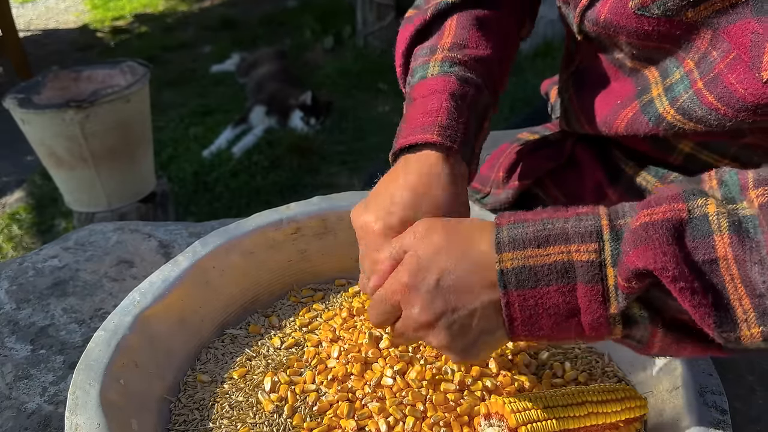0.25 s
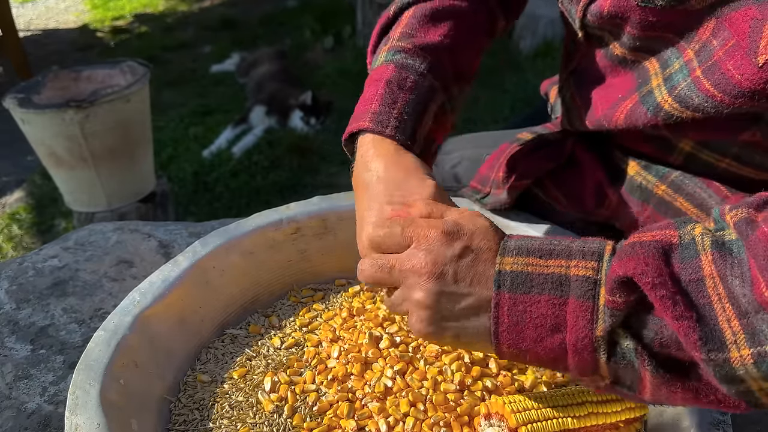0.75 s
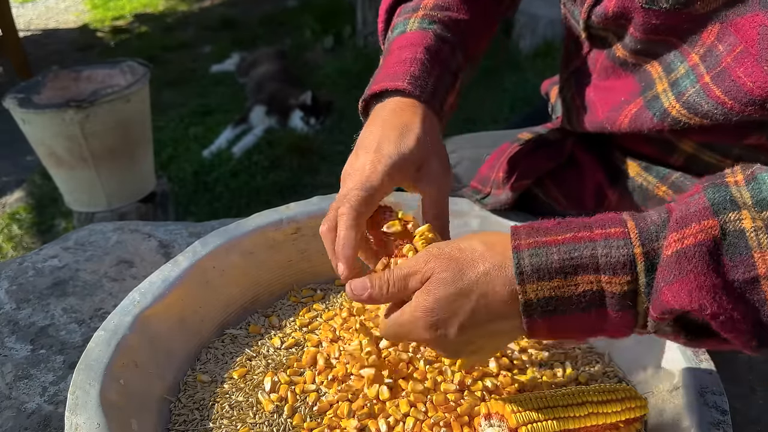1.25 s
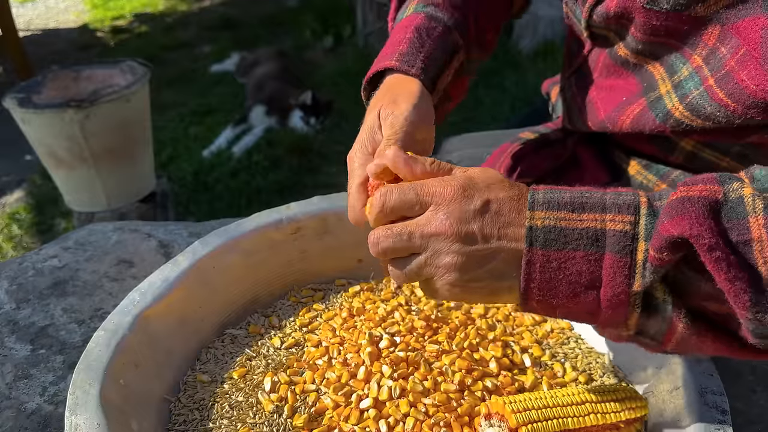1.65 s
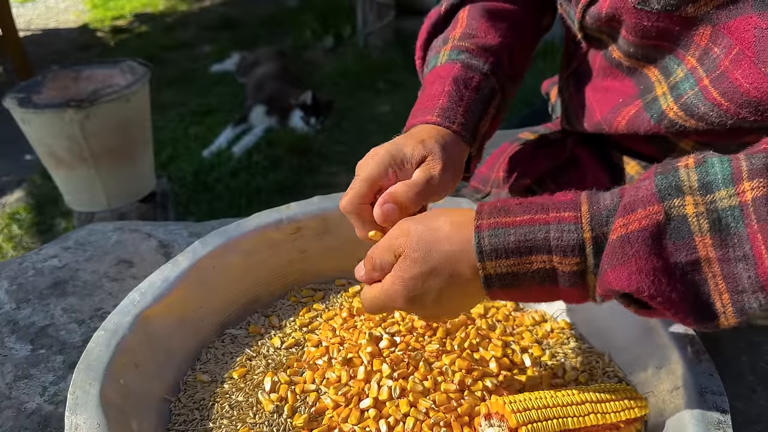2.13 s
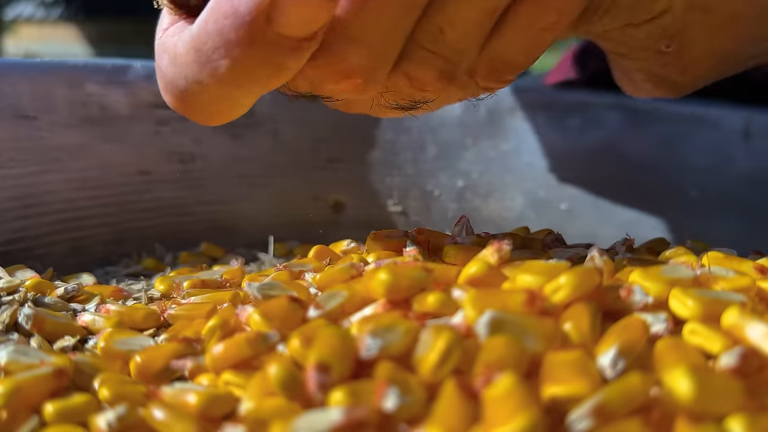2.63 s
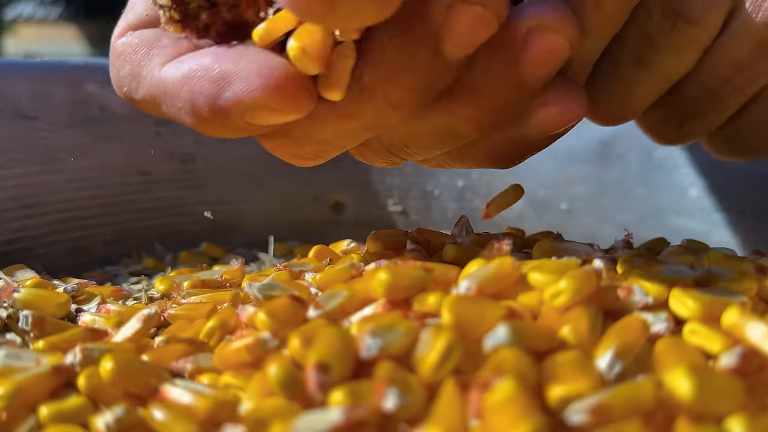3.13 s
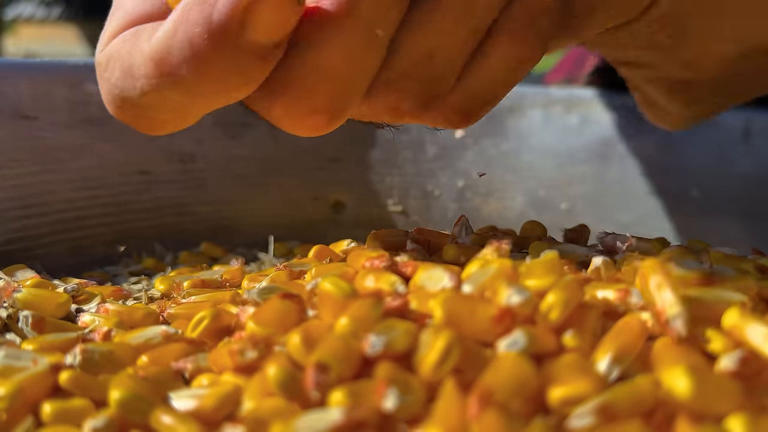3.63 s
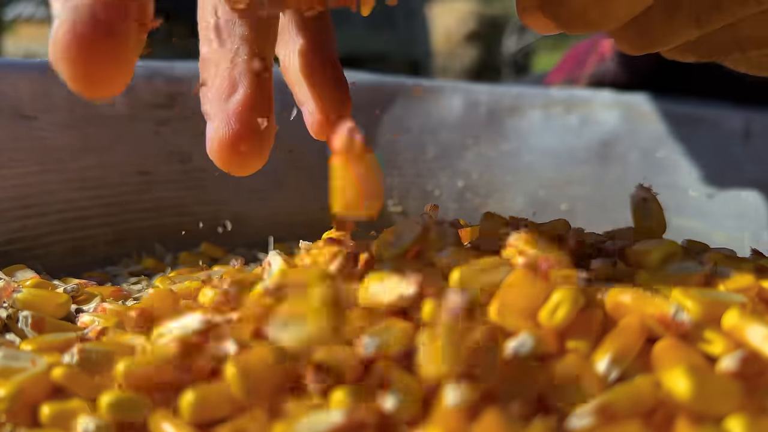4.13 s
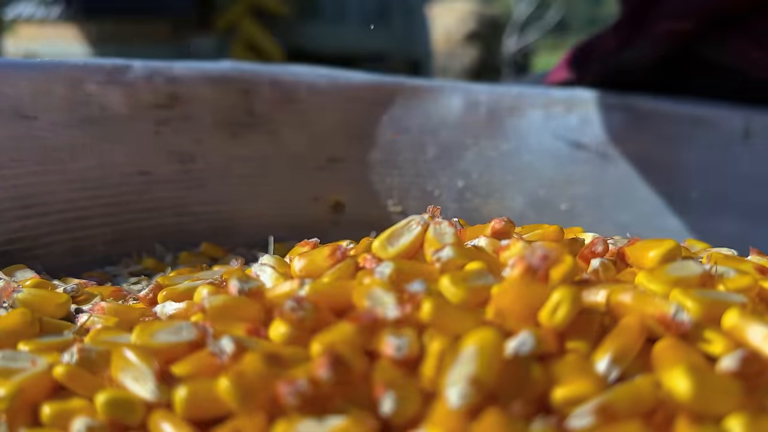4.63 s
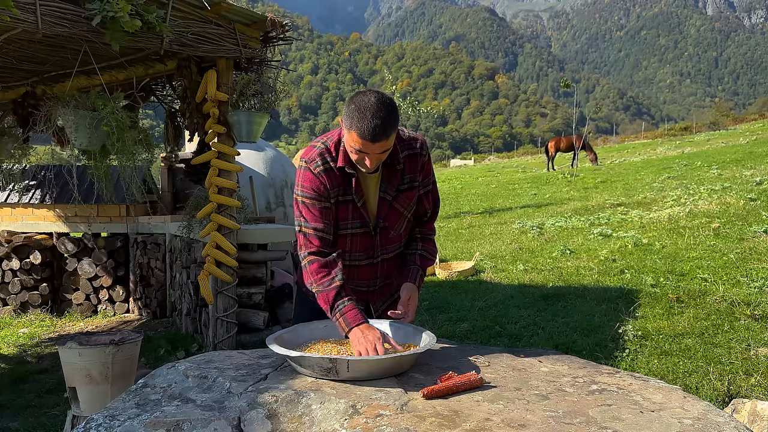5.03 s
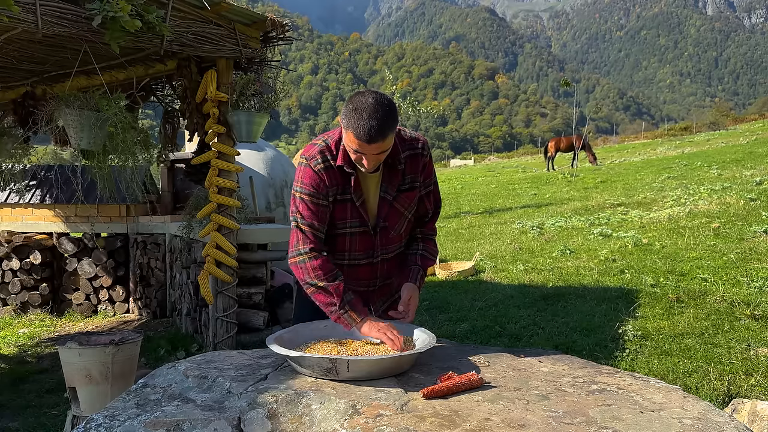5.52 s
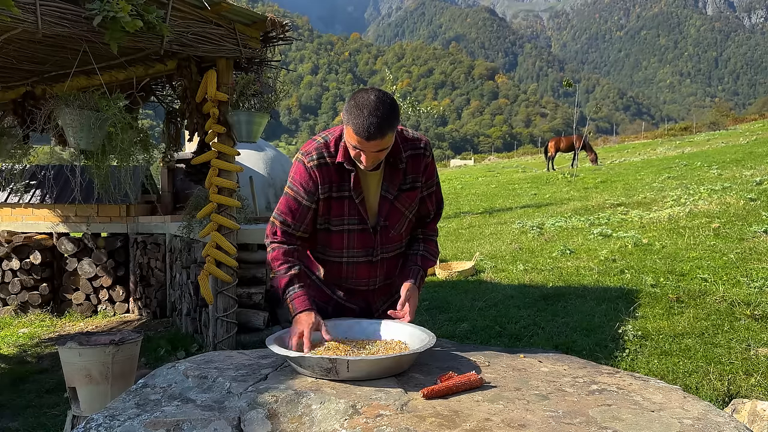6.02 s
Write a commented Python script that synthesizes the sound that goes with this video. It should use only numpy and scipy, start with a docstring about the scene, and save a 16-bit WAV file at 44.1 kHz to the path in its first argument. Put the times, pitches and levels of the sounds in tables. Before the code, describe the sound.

Outdoors, close to a metal basin, hands twist a dry corn cob with soft rustles and scattered clicks. One kernel pings sharply off the bare wall. The patter thickens, a handful tumbles onto the heap with small dull thuds, then quiet, then a smooth grainy rake. Low wind buffets the microphone throughout, strongest near the raking.

```python
"""Hands twist dried kernels off a cob over a metal basin outdoors, let a handful fall, then rake the heap.
Noise swelling with each stroke makes the rustle; short bursts make the ticks of single kernels on the heap.
Damped tones thud in the loaded basin floor, and a few kernels set the bare basin wall ringing.
These sounds and a deep wind rumble sit in the centre, as from a near microphone.
Around them, as from a wide pair, shaped noise makes the open air and gusts, and slowing tones the wind slaps."""
import sys
import numpy as np
from scipy import signal
from scipy.fft import rfft, irfft
from scipy.io import wavfile
from scipy.ndimage import uniform_filter1d

SR = 44100
rng = np.random.default_rng(int(sys.argv[2]) if len(sys.argv) > 2 else 0)


def wav_out(sig):
    """Save sig, one row per channel (or a flat mono array), as 16-bit PCM at SR to the path in sys.argv[1]."""
    wavfile.write(sys.argv[1], SR, np.round(np.clip(np.atleast_2d(sig).T, -1, 1) * 32767).astype(np.int16))


N = 276507  # samples, about 6.3 s


def amp(db):
    """Turns decibels into a gain."""
    return 10 ** (np.asarray(db) / 20)


def evened(x):
    """Scales to an rms of 1."""
    return x / np.sqrt(np.mean(x ** 2) + 1e-20)


def peaked(x):
    """Scales to a peak of 1."""
    return x / abs(x).max()


def band(x, lo_hz, hi_hz, order=2):
    """Keeps the sound between two frequencies."""
    edges_hz = np.clip([lo_hz, hi_hz], 100, 21000)
    return signal.lfilter(*signal.butter(order, edges_hz, "band", fs=SR), x)


def hump(hz, centre_hz, octaves):
    """A broad resonance, symmetric on an octave scale."""
    distance = np.log2((hz + 1) / centre_hz) / octaves
    return 1 / (1 + distance ** 2)


def read(points, hz):
    """Reads a table of points along a log-frequency axis."""
    f, value = np.transpose(points)
    return np.interp(np.log(hz + 1), np.log(f + 1), value)


def curve(rows, t):
    """Reads every column of a time table at the times t."""
    s, *columns = np.transpose(rows)
    return [np.interp(t, s, c) for c in columns]


def add(mix, s, sound):
    """Mixes a sound in at time s, cut off at the end of the mix."""
    part = mix[..., round(s * SR):][..., :sound.shape[-1]]
    part += sound[..., :part.shape[-1]]


# how much stronger the left side of the noise is than the right: (f/Hz, level/dB)
SIDE_LEAN = [(60, -5), (250, -0.3), (600, 4.5), (1200, 4.5), (2500, 3.5)]


def noise(colour, same):
    """Two channels of steady coloured noise; same runs from 1 alike, through 0 unrelated, to -1 opposed."""
    hz = np.fft.rfftfreq(N, 1 / SR)
    a, b = rfft(rng.standard_normal((2, N)))
    same = np.clip(read(same, hz), -1, 1)
    right = same * a + np.sqrt(1 - same ** 2) * b
    pair = np.array([a, right]) * amp(read(colour, hz))
    lean = amp(np.outer([.5, -.5], read(SIDE_LEAN, hz)))
    return evened(irfft(pair * lean, N))


# colour of the open field, relative: (f/Hz, level/dB per Hz)
AIR_COLOUR = [(65, -39.5), (110, -5), (211, -4), (395, -12), (682, -10.5), (1200, -15.5), (1510, -20.5),
              (1680, -20), (3650, -37.5), (4790, -46.5), (10600, -57), (12000, -53), (16500, -99.5)]
# how alike the air is left and right: (f/Hz, likeness -1 to 1)
AIR_LIKENESS = [(60, 1), (290, 0.46), (640, -0.4), (1400, -0.24), (2100, -0.74), (2900, 0.49), (4000, 1)]


def air():
    """The open field is a steady, wide wash of noise."""
    return amp(-53.5) * noise(AIR_COLOUR, AIR_LIKENESS)


# colour of the deep wind pressure, relative: (f/Hz, level/dB per Hz)
RUMBLE_TONE = [(1, 17.5), (2, -10), (16, 0.5), (24, -6), (44, -27), (90, -29.5), (300, -90)]
# colour of the gusts, relative: (f/Hz, level/dB per Hz)
GUST_TONE = [(10, -15), (25, 6), (42, 24), (64, 21.5), (110, 13), (170, 7), (300, -72.5)]
# how the wind comes and goes, settings before the lumps and the left-right lean:
# (t/s, rumble level/dB, gust level/dB, level/dB of the gusts' opposed left-right part)
WIND_COURSE = [(0, -33, -49.5, -83), (.5, -35, -50.5, -77), (.84, -31, -51.5, -62), (1.1, -29.5, -45, -53),
               (1.43, -42, -50.5, -63), (1.61, -38.5, -47.5, -50), (1.9, -37, -53.5, -55),
               (2.4, -42, -45.5, -53), (2.9, -44.5, -45.5, -54), (3.1, -38, -46.5, -52),
               (3.5, -38.5, -55, -62), (3.8, -33.5, -47.5, -57), (4.3, -36.5, -51.5, -64),
               (4.64, -44, -48.5, -64), (4.85, -28.5, -52, -63), (5.03, -30, -53.5, -61),
               (5.15, -25, -44, -52), (5.42, -21.5, -56, -73), (5.65, -28, -57.5, -58),
               (6.1, -29.5, -62.5, -78), (6.27, -40, -46, -69)]
# wind slaps sweeping across the pair, the level 6.8 dB above the envelope's peak:
# (t/s on the right, level/dB, f/Hz it slows to, lag of the left side/s)
WIND_SLAPS = [(0.956, -31, 70.4, 0.0038), (1.55, -29.5, 65.4, 0.0023), (2.132, -36, 59.5, 0.0061),
              (3.049, -30, 56, 0.0043), (3.888, -29, 65, 0.0038), (4.305, -33, 80, 0.006),
              (5.111, -23, 64.4, 0.0047)]
LUMPS_DB = 3  # rms swing of the gusts


def wind():
    """Deep pressure swings in the centre, lumpy gusts on the pair, and single slaps."""
    t = np.arange(N) / SR
    near_db, shared_db, opposed_db = curve(WIND_COURSE, t)
    swing = noise(RUMBLE_TONE, [(1, 0.38)])[0]
    # steady its strength first, so that the table shapes it
    swing = swing / np.sqrt(uniform_filter1d(swing ** 2, size=SR // 4) + 0.15)
    out = swing * amp(near_db)

    # eight slow waves, 1.15 to 5.2 per second, make each part of the gusts lumpy
    waves = (np.sin(2 * np.pi * (4.6 * k / 8 * t + rng.random((2, 1)))) for k in range(2, 10))
    lumps = evened(sum(waves))
    gust_noise = noise(GUST_TONE, [(1, 0.005)])
    shared, opposed = gust_noise * amp([shared_db, opposed_db] + LUMPS_DB * lumps)
    out = out + shared + opposed * [[1], [-1]]

    u = t[:6000]
    for s, db, hz, lag in WIND_SLAPS:
        # the eddy starts small and fast, then slows
        turns = hz * (u + 0.0096 * (1 - np.exp(-u / 0.0091)))
        slap = amp(db) * np.sin(2 * np.pi * turns) * u / 0.02 * np.exp(1 - u / 0.0091)
        add(out[0], s + lag, slap)
        add(out[1], s, slap)
    return out


# kernels striking the bare wall; crack and knock are relative to the ringing:
# (t/s, peak level/dB, place on the wall 0 rim to 1 low flank, crack level/dB, knock level/dB)
WALL_STRIKES = [(0.9683, -37, 0.63, -14, 5.5), (.989, -18.5, 0.96, -26, -12), (1.0995, -30, 0.65, -23, -11),
                (1.1335, -38, 0.6, -17, -4), (1.5005, -7.5, 0.053, -6.5, -18),
                (5.5378, -35, 0.44, -11, -27), (5.564, -31, 0.27, -28, -7)]
# ringing tones of the basin wall, relative levels:
# (f/Hz, level/dB struck at the rim, level/dB struck on the flank, time to fade 60 dB at the rim/s)
WALL_MODES = [(560, -26, -16, .05), (660, -22, -16, .05), (845, -33, -17, .38), (1100, -26, -22, .04),
              (2103, -11, -24, .045), (2350, -16, -18, .045), (2496, -9, -10, .05), (2856, -6, 0, .045),
              (3225, -8, -10, .04), (3356, -14, -1, .05), (3571, 0, -14, .045), (4129, -6, -9, .03),
              (4588, -9, -11, .035), (5312, -17, -16, .03), (6500, -20, -24, .025), (7575, -11, -22, .02),
              (8765, -11, -24, .02), (10842, -11, -24, .02), (13215, -15, -27, .018),
              (15400, -16, -30, .015)]
FLANK_DAMPING = 0.34  # share of the ring time that the heap takes from the low flank


def basin():
    """A hard kernel cracks on the wall, knocks the bowl and leaves its modes ringing."""
    out, t = np.zeros(N), np.arange(12000) / SR
    hz, rim_db, flank_db, rim_t60 = np.transpose(WALL_MODES)[:, :, None]
    draws = rng.standard_normal((len(WALL_STRIKES), 12000))
    for (s, db, place, crack_db, knock_db), draw in zip(WALL_STRIKES, draws):
        depth = np.clip(place, 0, 1)
        mode_db = rim_db + depth * (flank_db - rim_db)
        t60 = rim_t60 * (1 - FLANK_DAMPING * depth)
        phase = np.pi * draw[:len(WALL_MODES), None]
        modes = amp(mode_db - 60 * t / t60) * np.sin(2 * np.pi * hz * t + phase)
        ring = modes.sum(0)
        dense = band(draw, 2580, 5000, order=3) * amp(-60 * t / 0.026)  # many weak, close modes
        thrown_back = amp(-13 - 60 * t / 0.051)  # the bowl returns some of the crack
        crack = band(draw, 6900, 13000) * (amp(-60 * t / 0.015) + thrown_back)
        knock = band(draw, 530, 1170) * amp(-60 * t / 0.11)
        hit = evened(ring) + amp(-4.5 - 16.0 * place) * evened(dense)
        hit = hit + amp(crack_db) * evened(crack) + amp(knock_db) * evened(knock)
        onset = 1 - np.exp(-t / 0.00012)
        add(out, s, amp(db) * peaked(hit * onset))
    return out


# kernels loading the basin floor through the heap: (t/s, peak level/dB, f/Hz)
FLOOR_THUDS = [(2.983, -42.5, 480), (2.998, -49, 407), (3.023, -42.5, 785), (3.05, -44, 585),
               (3.074, -43.5, 980), (3.102, -43.5, 635), (3.12, -46, 464), (3.186, -47, 470),
               (3.231, -40.5, 410), (3.283, -48, 553), (3.322, -48, 438), (3.341, -44, 417),
               (3.359, -43, 524), (3.375, -48, 554), (3.427, -58, 530), (3.47, -50, 510),
               (3.542, -39.5, 430), (3.556, -42, 416), (3.583, -43, 545), (3.631, -40, 550),
               (3.678, -48.5, 458), (3.788, -43.5, 664), (3.814, -47, 580), (3.836, -42.5, 460),
               (3.873, -46, 443), (3.889, -45, 540), (3.909, -46, 530), (3.925, -44, 580),
               (3.994, -42.5, 570), (4.01, -41.5, 620), (4.046, -41, 526), (4.085, -45.5, 590),
               (4.104, -43, 500), (4.131, -40.5, 615), (4.174, -38, 500), (4.235, -49, 422),
               (4.252, -48, 576)]
TUMBLE_DB, TUMBLE_S = -6, 0.077  # smaller landings: level against the thuds, averaging time


def thuds():
    """The loaded floor answers with a damped tone and rough noise; smaller landings fill in around them."""
    out, t = np.zeros(N), np.arange(3000) / SR
    fade = amp(-60 * t / 0.046) * (1 - np.exp(-t / 0.00096))
    draws = rng.standard_normal((len(FLOOR_THUDS), 3000))
    for (s, db, hz), draw in zip(FLOOR_THUDS, draws):
        tone = np.sin(2 * np.pi * hz * t)
        rough = 0.89 * evened(band(draw, 360, 617))
        add(out, s, amp(db) * peaked((tone + rough) * fade))
    busy = np.sqrt(abs(uniform_filter1d(out ** 2, size=round(TUMBLE_S * SR))))
    return out + amp(TUMBLE_DB) * busy * evened(band(rng.standard_normal(N), 414, 625))


# the loudest kernels snapping loose or landing on the heap:
# (t/s, body peak level/dB, body f/Hz, treble peak level/dB)
KERNEL_TICKS = [(0.022, -44, 1720, -59), (0.16, -38, 1740, -54), (.1734, -42, 2560, -75),
                (.245, -34, 4470, -55), (0.2578, -26.5, 1610, -36), (.272, -53, 5880, -56),
                (0.299, -37.5, 1740, -35.5), (0.336, -39, 1900, -47), (0.507, -45.5, 3600, -66),
                (0.559, -29.5, 1880, -42), (.5905, -46, 5100, -59), (0.6716, -43, 2300, -50),
                (.937, -41.5, 6200, -56), (1.1563, -45, 4970, -41), (1.2815, -40.5, 4250, -51),
                (1.2947, -37, 5650, -39), (1.301, -36, 4600, -35), (1.3248, -41, 2040, -32),
                (1.41, -42, 4500, -60), (1.585, -51, 5120, -55), (1.665, -35.5, 2720, -65),
                (1.789, -49, 4500, -64), (1.825, -51, 6000, -60), (1.872, -59, 4520, -58),
                (1.9465, -43, 3320, -65), (2.049, -39, 1720, -48), (2.073, -41.5, 5450, -43),
                (2.121, -31.5, 3970, -62), (2.127, -36.5, 2160, -53), (2.143, -35, 2520, -39),
                (2.1636, -36, 5300, -54), (2.1802, -31.5, 4460, -54), (2.4203, -47, 2750, -60),
                (2.4347, -39.5, 2640, -65), (2.4534, -40, 1520, -34), (2.4628, -40, 2600, -32.5),
                (2.4702, -37, 4670, -47), (2.5153, -38, 4460, -30.5), (2.5313, -42, 5400, -40),
                (2.5664, -43, 3490, -35), (2.579, -36, 3100, -37), (2.5856, -30, 2900, -45),
                (2.592, -36, 3150, -51), (2.598, -39, 2910, -33), (2.606, -37.5, 4930, -53),
                (2.6228, -40.5, 1700, -41), (2.6463, -35.5, 3020, -51), (2.676, -37, 3080, -61),
                (2.682, -30, 2700, -50), (2.6891, -29, 3240, -31.5), (2.7008, -32, 3300, -55),
                (2.7136, -38, 4450, -48), (2.7214, -29.5, 4820, -38), (2.726, -28.5, 3100, -48),
                (2.7404, -43, 3430, -56), (2.8764, -44, 3300, -53), (2.8903, -38, 2840, -55),
                (2.9294, -37.5, 3730, -57), (2.983, -34, 4900, -53), (2.9858, -34, 1780, -30.5),
                (2.996, -37, 3800, -59), (3.0252, -36, 1660, -49), (3.0336, -38, 4370, -30),
                (3.0455, -36, 2920, -52), (3.074, -29.5, 2000, -50), (3.0773, -18.5, 5270, -47),
                (3.1149, -51, 2480, -38), (3.121, -44, 5000, -44), (3.1278, -54, 1310, -37.5),
                (3.1343, -50, 1720, -43), (3.142, -52, 2800, -42), (3.23, -43, 1210, -31.5),
                (3.2367, -33, 1670, -55), (3.3405, -55, 2800, -33), (3.3461, -34, 1510, -47),
                (3.3596, -53, 2630, -31), (3.4043, -33, 5660, -49), (3.4309, -29, 1480, -50),
                (3.4594, -48, 1420, -51), (3.5016, -42.5, 1510, -58), (3.5418, -35, 4050, -36),
                (3.556, -36, 1210, -28.5), (3.591, -46, 4320, -57), (3.633, -32, 5240, -32),
                (3.672, -39, 1580, -49), (3.73, -39, 1560, -42), (3.79, -43, 2540, -37),
                (3.828, -35, 5300, -25.5), (3.838, -35.5, 5360, -28), (3.9018, -44, 1690, -33),
                (3.9277, -31, 4600, -29), (3.944, -38, 6340, -36), (3.9688, -39, 5000, -35),
                (3.9965, -55, 1830, -32), (4.0069, -53, 2300, -38), (4.0153, -56, 6290, -30),
                (4.026, -29.5, 5830, -27), (4.045, -37, 4730, -29), (4.0757, -42, 4950, -38),
                (4.081, -54, 4240, -33), (4.119, -34.5, 4700, -33), (4.1312, -37, 6100, -34),
                (4.176, -32.5, 4970, -23), (4.1906, -38.5, 1660, -37), (4.2095, -38, 5960, -31.5),
                (4.2701, -59, 1290, -42), (4.3898, -43.5, 4500, -44), (4.4715, -46, 4570, -72),
                (4.634, -40.5, 2660, -62), (5.21, -35, 4100, -51), (5.4648, -35.5, 2770, -58),
                (5.6, -33, 3470, -58), (5.9392, -43, 4070, -62), (5.95, -39, 4100, -61),
                (5.9565, -43, 3600, -58), (5.991, -48, 3530, -60), (6.0154, -35, 2500, -44),
                (6.0615, -33, 4370, -44), (6.0655, -27, 2870, -28.5), (6.0719, -28, 2200, -56),
                (6.08, -33, 1140, -48)]
TICK_T60_S = 0.014  # time for the main burst to fade 60 dB


def ticks():
    """Each kernel is a short burst through its body resonance plus a bright edge that dies sooner."""
    out, t = np.zeros(N), np.arange(2048) / SR
    scatter = amp(-13.5 - 60 * t / 0.042)  # neighbours shift a little afterwards
    body_fade = amp(-60 * t / TICK_T60_S) + scatter
    edge_fade = amp(-60 * t / (0.17 * TICK_T60_S)) + scatter
    ring_fade = amp(-60 * t / (1.14 * TICK_T60_S))
    draws = rng.standard_normal((len(KERNEL_TICKS), 2048))
    for (s, body_db, hz, treble_db), draw in zip(KERNEL_TICKS, draws):
        draw = draw + 4.6 * (t == 0)  # the first contact is a sharp click
        burst = draw * body_fade
        body = peaked(band(burst, hz / 1.15, hz * 1.165, order=1)) + peaked(band(burst, 1120, 6660))
        body = body + 0.55 * np.sin(2 * np.pi * hz * t) * ring_fade  # the kernel's own short ring
        edge = band(draw * edge_fade, 5500, 13800)
        add(out, s, amp(body_db) * peaked(body) + amp(treble_db) * peaked(edge))
    return out


def contacts(per_s, spread_db):
    """A random train of tiny contacts, a few of them large, as a gate for noise."""
    size = amp(spread_db * np.minimum(rng.exponential(1, N), 4))
    size = size * (rng.random(N) < per_s / SR)  # only a few samples hold a contact
    fade = amp(-60 * np.arange(600) / SR / .0035)
    grains = signal.oaconvolve(size ** 2, fade)[:N]
    return evened(np.sqrt(abs(grains)))


# twists of the cob, the falling handful and the rakes; levels are relative settings for the rustle:
# (start t/s, length/s, share of it spent swelling, body level/dB, hollow of the hands f/Hz at the start,
#  f/Hz at the end, treble level/dB, cupped palm level/dB)
HAND_STROKES = [(-.1, 0.18, 0.89, -65, 2400, 2390, -74, -78),
                (0.144, 0.28, 0.12, -64, 2410, 2200, -77, -68),
                (0.436, 0.33, 0.17, -65.5, 2200, 2200, -81, -72),
                (0.825, 0.4, 0.43, -65, 2800, 3000, -73, -68),
                (1.19, 0.26, 0.52, -68, 2500, 2500, -69.5, -81),
                (1.495, 0.22, 0.32, -72.5, 3180, 2800, -76, -78),
                (1.756, 0.38, 1, -66.5, 2320, 2400, -82, -75),
                (2.004, 0.42, 0.43, -67, 2590, 3070, -75, -72),
                (2.237, 0.36, 0.52, -64.5, 2760, 3460, -67.5, -88),
                (2.508, 0.19, 0.53, -58, 3030, 2900, -72, -75),
                (2.652, .12, 0.36, -54.5, 2900, 3000, -81, -66),
                (2.818, 0.36, 0.23, -58.5, 2900, 3400, -66, -62.5),
                (3.168, 0.35, 0.64, -54.5, 2400, 2930, -68, -62),
                (3.572, 0.35, 0.36, -58, 3100, 2750, -66, -58.5),
                (3.778, 0.44, 0.86, -63, 3060, 3950, -62, -70),
                (4.338, 0.5, 0.61, -69.5, 2750, 2540, -67, -77),
                (4.79, .24, 0.55, -62.5, 4900, 4360, -71, -87),
                (4.94, 0.34, 0.47, -54.5, 3880, 2830, -65.5, -73),
                (5.09, 0.581, 0.77, -56, 2900, 2500, -62.5, -63.5),
                (6.038, .08, 0.42, -53.5, 3000, 2400, -58, -70),
                (6.09, 0.18, .4, -55.5, 2250, 2800, -61, -70)]
SWELL_EDGE, FALL_EDGE = 1.22, 0.85  # powers: 2 is soft, below 1 is abrupt
SETTLE_DB, SETTLE_T60_S = -15.5, 0.62  # kernels go on trickling after the hand lets go


def strokes(t):
    """Progress 0-1 and strength 0-1 of each stroke: it swells, lets go, and the kernels settle."""
    start, length, swell = np.transpose(HAND_STROKES)[:3, :, None]
    progress = np.clip((t - start) / length, 0, 1)
    swell = np.clip(swell, .05, .95)
    rise = np.sin(np.pi / 2 * np.minimum(progress / swell, 1)) ** SWELL_EDGE
    fall = np.sin(np.pi / 2 * np.minimum((1 - progress) / (1 - swell), 1)) ** FALL_EDGE
    settle = amp(SETTLE_DB - 60 * np.maximum(t - start - length, 0) / SETTLE_T60_S)
    return progress, rise * np.maximum(fall, settle)


REST_DB, REST_TREBLE_DB, REST_HZ = -77.5, -81.5, 1950  # hands nearly still: body, treble, hollow
PALM_HZ, PALM_OPENS_HZ = 1473, 350  # the palm's low hollow, and its rise as the grip opens


def hands(t):
    """Gains of body, treble and palm and the two hollows in Hz, with the power of all strokes summed."""
    progress, strength = strokes(t)
    body_db, from_hz, to_hz, treble_db, palm_db = np.transpose(HAND_STROKES)[3:, :, None]
    body, treble, palm = ((amp(db) * strength) ** 2 for db in (body_db, treble_db, palm_db))
    rest = amp(REST_DB) ** 2
    body_sum = body.sum(0) + rest
    stroke_hz = from_hz + (to_hz - from_hz) * progress
    # stronger strokes count for more in the shared hollow
    hollow_hz = ((body * stroke_hz).sum(0) + rest * REST_HZ) / body_sum
    palm_hz = PALM_HZ + PALM_OPENS_HZ * (palm * progress).sum(0) / (palm.sum(0) + 1e-20)
    treble_sum = treble.sum(0) + amp(REST_TREBLE_DB) ** 2
    return np.sqrt([body_sum, treble_sum, palm.sum(0)]), hollow_hz, palm_hz


# the packed kernels shifting under the hands, relative: (t/s, level/dB)
HEAP_SHIFT = [(0.0, -69), (0.37, -70), (0.86, -67.5), (1.06, -67), (1.82, -73.5), (2.67, -63), (2.79, -69),
              (3.79, -65.5), (4.07, -67.5), (4.23, -69), (4.45, -72), (5.01, -63), (5.2, -57.5),
              (5.41, -62.5), (5.76, -66.5), (5.97, -66.5), (6.27, -57.5)]
# smooth hiss against single contacts; twisting crackles, raking a whole heap is smooth: (t/s, smoothness)
HISS_SMOOTHNESS = [(0, 1.3), (2.3, 1.08), (2.5, 1.6), (4.2, 1.33), (4.5, 1.8), (5.9, 3.3), (6.27, 3.3)]


def rustle(patchy_db=1.5, grain_colour_db=3):
    """Countless small kernel contacts, coloured by the hollow of the hands and by drifting patches."""
    smooth = abs(curve(HISS_SMOOTHNESS, np.arange(N) / SR)[0])
    hiss = rng.standard_normal(N)
    gate = contacts(500, 4.85) + smooth ** 1.373
    raw = hiss * gate / np.sqrt(1 + smooth ** 1.4 + smooth ** 2.87)
    hz, t, z = signal.stft(raw, SR, nperseg=256, noverlap=192)
    (body_gain, treble_gain, palm_gain), hollow_hz, palm_hz = hands(t)
    hz = hz[:, None]

    palm = hump(hz, palm_hz, 0.074) ** 0.72
    body = hump(hz, hollow_hz, 0.5) ** 2.1 + amp(-1.0) * hump(hz, 3980, 0.86) ** 2
    treble = hump(hz, 8000, 0.86) * hump(np.maximum(hz, 12500), 8300, 0.05)  # drops faster above 12.5 kHz
    low = hump(hz, 1212, 1.0) ** 2
    # even out each colour, so that the gains alone set its strength
    body, treble, palm, low = (v / np.sqrt((v ** 2).mean(0)) for v in (body, treble, palm, low))
    shape = body_gain * body + treble_gain * treble + palm_gain * palm
    shape = shape + amp(curve(HEAP_SHIFT, t)[0]) * low

    slow, quick = rng.standard_normal((2,) + z.shape)
    patches = evened(uniform_filter1d(uniform_filter1d(slow, 4, 0), 24, 1))
    # each contact rings a little differently
    colours = evened(uniform_filter1d(uniform_filter1d(quick, 9, 0), 4, 1))
    uneven = 1 / np.maximum(curve(HISS_SMOOTHNESS, t)[0], 1)  # a raked heap averages the colours out
    flicker = amp(patchy_db * patches + uneven * grain_colour_db * colours)
    bass_cut = hz ** 2 / (hz ** 2 + 700 ** 2)
    return signal.istft(z * shape * flicker * bass_cut, SR, nperseg=256, noverlap=192)[1][:N]


def scene():
    """Near sounds in the centre, field and wind around them."""
    near = basin() + ticks() + thuds() + rustle()
    return near + wind() + air()


def record(dry):
    """The band limit of the recorder: a steep filter removes the sound above about 16.4 kHz."""
    lowpass = signal.firwin(255, 16400, window=("kaiser", 9), fs=SR)
    return signal.oaconvolve(dry, lowpass[None], "same")


dry = scene()
out = record(dry)
wav_out(out)
```